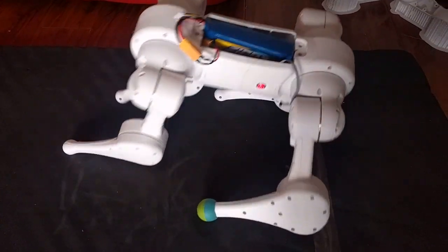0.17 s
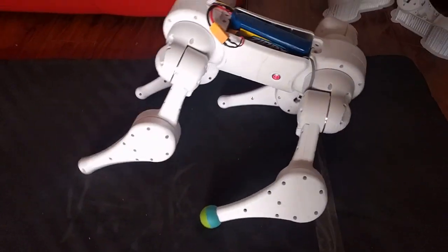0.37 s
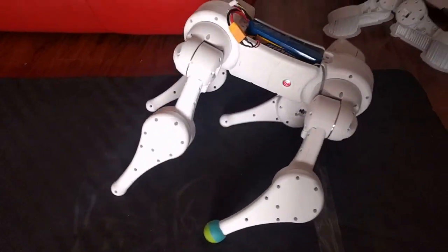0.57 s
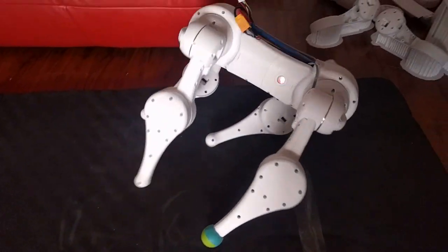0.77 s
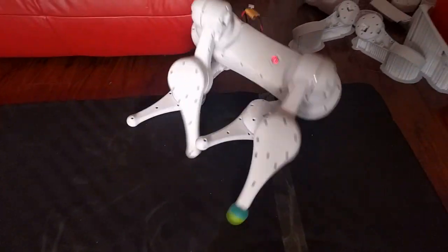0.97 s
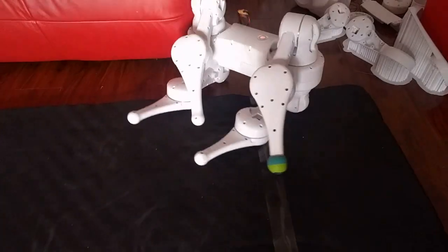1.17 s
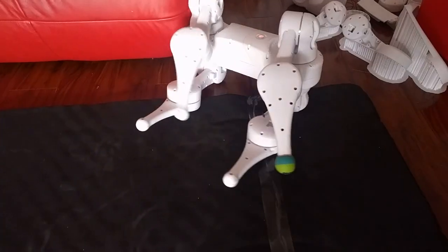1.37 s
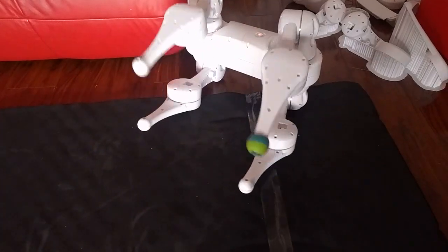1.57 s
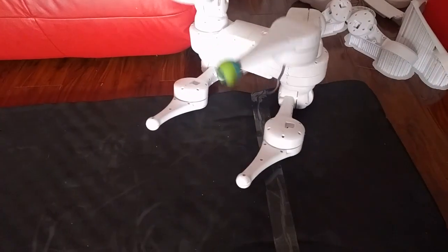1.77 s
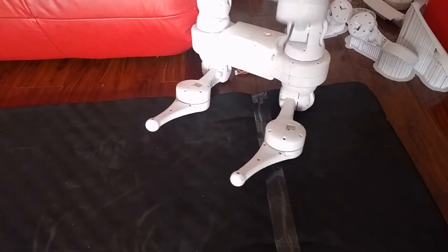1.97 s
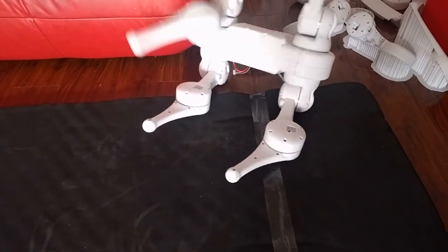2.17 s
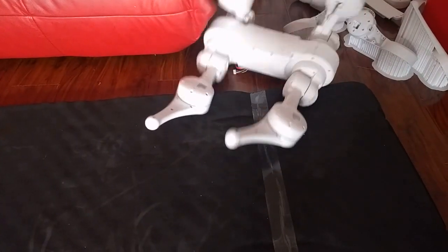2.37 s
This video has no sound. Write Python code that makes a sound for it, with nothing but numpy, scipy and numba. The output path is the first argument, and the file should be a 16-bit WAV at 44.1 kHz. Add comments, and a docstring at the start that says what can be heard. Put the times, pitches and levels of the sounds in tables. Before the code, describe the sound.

Small geared motors whirr and judder as a plastic robot clacks and thumps on a mat.

```python
"""Toy robot walking on a rubber mat

A plastic robot jerks about in a living room. Its geared motors whirr with a stream of tiny tooth and
brush ticks and, under load, judder through the hollow shell. Joints clack in gritty bursts that ring
the plastic, and the body thumps on the mat. The knocks echo lightly over a steady hush."""
import sys
import numpy as np
from scipy import signal
from scipy.fft import rfft, irfft
from scipy.io import wavfile
from scipy.ndimage import uniform_filter1d
from numba import njit

SR = 44100
rng = np.random.default_rng(int(sys.argv[2]) if len(sys.argv) > 2 else 0)


def store_pcm(level_fs):
    """Save levels as 16-bit WAV."""
    pcm = np.round(np.clip(level_fs, -1, 1) * 32767).astype(np.int16)
    wavfile.write(sys.argv[1], SR, np.atleast_2d(pcm).T)


N = 107427
T = np.arange(N) / SR


def undb(db):
    """Decibels to gain."""
    return 10 ** (np.asarray(db) / 20)


def unit(x):
    """Scale to rms 1."""
    return x / np.sqrt(np.mean(x ** 2))


def curve(table, col):
    """One column of a table as an automation line over time."""
    points = np.array(table, float)
    return np.interp(T, points[:, 0], points[:, col])


def wander(rate_hz):
    """A smooth random drift, rms 1: held values slewed twice."""
    hold = int(SR / rate_hz)
    steps = np.repeat(rng.standard_normal(N // hold + 1), hold)
    return unit(uniform_filter1d(uniform_filter1d(steps, hold), hold)[:N])


def colour(x, spectrum):
    """Shape a signal with an EQ curve, then scale to rms 1."""
    hz, db = np.array(spectrum, float).T
    bins_hz = np.fft.rfftfreq(N, 1 / SR)
    eq_db = np.interp(np.log(bins_hz + 1), np.log(hz), db, left=-70, right=db[-1] - 12)
    return unit(irfft(rfft(x) * undb(eq_db), N))


@njit
def resonance(x, hz, width_hz):
    """State-variable band-pass with gain 1 at its moving centre."""
    out, band_state, low_state = np.empty(len(x)), 0., 0.
    for i in range(len(x)):
        tuning, damping = np.tan(np.pi * hz[i] / SR), width_hz / hz[i]
        passed = (band_state + tuning * (x[i] - low_state)) / (1 + tuning * (tuning + damping))
        band_state = 2 * passed - band_state
        low_state += 2 * tuning * passed
        out[i] = damping * passed
    return out


def band(x, hz, width_hz):
    """Steep band-pass: two resonances in series."""
    hz = np.ones(N) * hz
    return resonance(resonance(x, hz, float(width_hz)), hz, 0.91 * width_hz)


def ring(blows, modes):
    """Blows excite a set of decaying sine modes."""
    t = np.arange(SR // 2) / SR
    response = sum(undb(db) * np.sin(2 * np.pi * hz * t) * 1000. ** (-t / t60) for hz, db, t60 in modes)
    return signal.fftconvolve(blows, response / np.abs(response).max())[:N]


def motors():
    """Dense tooth and brush ticks in four colours follow the load; the gear cases sing with the whine."""
    # Motor levels under changing load: time_s, rasp_db, whine_db, hiss_db, rattle_db
    levels = [(0, -55, -53, -61.5, -58.5), (.18, -55.5, -65, -76, -52.5), (.288, -46.5, -51, -66, -50.5),
              (.3, -39, -43, -53, -37), (.42, -42.5, -47.5, -65, -46.5), (.52, -49, -56, -63, -49),
              (.6, -49, -53.5, -63, -49.5), (.7, -47.5, -51, -59, -51), (.83, -49, -44.5, -55, -56.5),
              (.97, -52.5, -45, -48.5, -59), (1.015, -53, -48, -49.5, -62),
              (1.05, -42.5, -50.5, -42.5, -48), (1.12, -43.5, -46, -46, -50.5),
              (1.2, -37, -41.5, -42.5, -44), (1.29, -40, -43.5, -53, -47), (1.44, -44, -48.5, -63, -47),
              (1.498, -52, -55, -63.5, -52), (1.515, -30.5, -36.5, -58, -45), (1.67, -35, -48, -54, -36.5),
              (1.74, -39, -51.5, -59, -50.5), (1.87, -39.5, -75, -77, -48.5), (1.94, -47.5, -64, -72, -54),
              (2.1, -53, -62, -70, -60), (2.115, -54.5, -53, -61, -52), (2.29, -48.5, -56, -65, -49),
              (2.325, -39.5, -57, -58, -49), (2.335, -36.5, -34, -44, -30.5),
              (2.436, -39.5, -40, -56, -42.5)]
    # EQ curves of gear rasp, whine, brush hiss and shell rattle: freq_hz, gain_db
    rasp = [(700, -1.5), (1100, 4), (1500, 4), (2000, 3.5), (2380, 0.5), (2800, 3), (3300, -1.5),
            (3800, -2), (5000, -7.5), (7000, -17.5), (12000, -32)]
    whine = [(2000, -19), (3300, -3.5), (4000, -2.5), (4500, -0.5), (5150, -0.5), (5800, -1), (6500, -4.5),
             (7500, -10.5), (11000, -12)]
    hiss = [(3000, -33), (6000, 10), (8000, 10), (11000, 8), (16000, 6)]
    rattle = [(350, -7), (560, 1.5), (650, 5.5), (790, 4), (950, -1), (1300, -8), (2000, -22)]
    # Gear case resonances, relative to the whine: centre_hz, width_hz, level_db
    case_modes = [(2376, 180, -11), (3295, 440, -13.5), (5120, 320, -10.5)]
    ticks_per_s, flicker_db, case_waver = 9000, 0.5, 0.014
    whirr = cases = 0
    for col, spectrum in enumerate((rasp, whine, hiss, rattle), 1):
        ticks = (rng.random(N) < ticks_per_s / SR) * rng.standard_normal(N)
        whirr += colour(ticks, spectrum) * undb(curve(levels, col) + flicker_db * wander(rate_hz=39.6))
    for hz, width_hz, db in case_modes:
        wavering_hz = hz * (1 + case_waver * wander(rate_hz=5.96))
        cases += undb(db) * unit(band(ticks, wavering_hz, width_hz))
    return whirr + cases * undb(curve(levels, 2))


def judder():
    """A loaded motor's nearly regular jolts, with grit between them, make the body boom and hum."""
    # Shaking of the body: time_s, boom_db, boom_hz, hum_db, overtones_db
    shake = [(0.0, -49.5, 407, -69, -63), (0.12, -61, 316, -74, -54.5), (0.25, -53.5, 423, -72, -70),
             (0.32, -46, 467, -47, -51), (0.47, -50, 415, -55, -63.5), (0.74, -59, 290, -74, -51.5),
             (0.97, -56.5, 380, -82, -80), (1.06, -46.5, 290, -42, -47), (1.1, -48, 454, -48.5, -56),
             (1.17, -45, 422, -43.5, -49), (1.2, -37.5, 420, -48, -50), (1.28, -27.5, 463, -31, -33.5),
             (1.32, -34, 450, -45, -44), (1.36, -34.5, 357, -35.5, -43), (1.43, -38, 380, -33, -50),
             (1.52, -39, 427, -51, -31), (1.56, -25.5, 358, -51, -32), (1.67, -29, 386, -56, -29),
             (1.72, -25, 298, -55, -27), (1.76, -33, 333, -37, -35), (1.8, -31, 278, -39.5, -36),
             (1.86, -32, 315, -42, -39), (1.95, -41, 241, -47.5, -37.5), (2.07, -47.5, 277, -55.5, -54),
             (2.13, -45, 374, -61, -55), (2.27, -55, 368, -70, -51), (2.3, -41.5, 370, -49, -61),
             (2.37, -48, 407, -55, -33.5), (2.41, -29.5, 326, -39, -45), (2.44, -50, 403, -46, -34)]
    # Bands above the hum: centre_hz, width_hz, level_db
    overtone_bands = [(134.5, 12, -7), (199.4, 10.6, 0.5), (162, 40, -2)]
    judder_hz, jitter, scatter_db, roughness = 67.3, .035, 1.5, 1.1
    cycles = np.cumsum(judder_hz * (1 + jitter * wander(rate_hz=25)) / SR)
    size = undb(scatter_db * rng.standard_normal(1000))[cycles.astype(int)]  # one size per jolt
    jolts = unit(np.diff(np.floor(cycles), prepend=0) * size)
    drive = jolts + roughness * rng.standard_normal(N)
    boom = band(drive, curve(shake, 2), width_hz=228)
    hum = band(drive, judder_hz, width_hz=38)
    overtones = sum(undb(db) * unit(band(drive, hz, width)) for hz, width, db in overtone_bands)
    return sum(unit(x) * undb(curve(shake, col)) for x, col in ((boom, 1), (hum, 3), (overtones, 4)))


def room_tone():
    """The steady, low hush of room and microphone."""
    # EQ curve of the hush: freq_hz, gain_db
    hush = [(24, -36), (40, 1), (167, 2.5), (503, -8), (790, -6), (918, -6.5), (1020, -19), (5310, -23.5),
            (16000, -46)]
    return undb(-53) * colour(rng.standard_normal(N), hush)


def joint_clacks():
    """Each joint snaps with a burst of grit and a broad splash of noise, and rings the shell."""
    # Clacks, splash and ring relative to level: start_s, level_db, centre_hz, splash_db, ring_db, t60_s
    hits = [(.1320, -32.5, 3420, -7, -5, 0.027), (.2380, -41, 2960, -28, 10, .05),
            (.2928, -20, 2700, -16, -4, .05), (.3095, -19.5, 3600, -32, -1.5, 0.023),
            (.3170, -24.5, 5940, -32, -2, 0.052), (.4225, -28, 5300, -9.5, -20, 0.063),
            (.4860, -32, 3960, -1.5, -10, 0.032), (0.5653, -27, 5600, -2, -28, 0.03),
            (1.0200, -33.5, 990, -10, 1, 0.084), (1.0528, -31.5, 3570, -4, -13, .05),
            (1.1158, -21.5, 5370, -18.5, -21.5, 0.028), (1.1254, -17, 3020, -24, -8, 0.033),
            (1.1745, -20, 3600, -19, -1, 0.036), (1.2108, -23, 4700, 5, 8.5, 0.023),
            (1.2205, -30, 6500, -22, -13, 0.045), (1.2545, -27, 1660, -10, -19, 0.056),
            (1.3345, -31, 4930, -12, -12.5, .04), (1.4715, -39.5, 3050, 17.5, 1, 0.019),
            (1.5005, -24.5, 1990, -5, -3, 0.036), (1.5072, -17, 2570, -4.5, 4, 0.036),
            (1.5225, -22, 3160, -6, 5.5, 0.031), (1.6325, -21, 2450, -33, -18, 0.018),
            (1.6555, -32, 4420, 1, 4, .03), (1.6660, -35.5, 11900, 0, -22, 0.018),
            (2.0370, -38.5, 4630, -31, 0, 0.041), (2.1080, -30, 6040, 5.5, 4.5, 0.043),
            (2.2515, -39, 4650, -17, -19, 0.04), (2.3170, -26, 3500, -18, 5, 0.021),
            (2.3288, -12.5, 4550, -10.5, -17, 0.056), (2.3335, -26, 4940, -6, 6, 0.034),
            (2.4290, -47.5, 2000, 0, 8, .05)]
    # EQ curve of the splash: freq_hz, gain_db
    splash_eq = [(600, 0), (1500, 4), (4000, 2), (8000, -3.5), (16000, -10.5)]
    # Modes of the plastic shell: pitch_hz, level_db, t60_s
    shell_modes = [(614, 7, 0.055), (733.6, 9.5, 0.037), (1037.6, 5.5, 0.027), (1546, -9, 0.048)]
    attack_s = .0007
    grit_env, splash_env, blows = np.zeros((3, N))
    grit_hz = np.full(N, 3000.)
    for start_s, level_db, centre_hz, splash_db, ring_db, t60_s in hits:
        start, age_s = int(start_s * SR), np.maximum(T - start_s, 0)
        burst = np.minimum(age_s / attack_s, 1) * undb(level_db) * 1000. ** (-age_s / t60_s) / 2
        grit_env += burst
        splash_env += burst * undb(splash_db)
        grit_hz[start:] = centre_hz
        blows[start] = undb(level_db + ring_db)
    grit = unit(band(rng.standard_normal(N), grit_hz, width_hz=2480))
    splash = colour(rng.standard_normal(N), splash_eq)
    return grit_env * grit + splash_env * splash + ring(blows, shell_modes)


def body_thumps():
    """A soft press and rebound on the mat rings the body; a longer contact is duller."""
    # Landings and bounces: start_s, force_db, contact_ms
    landings = [(.5660, -33.5, 2.3), (1.0480, -42, 3.2), (1.2110, -7, 2.2), (1.2209, -14.5, 1.23),
                (1.2530, -17.5, 2.35), (1.2810, -33, 2.4), (1.3000, -21, 1.3), (1.3110, -21, 2.5),
                (1.3610, -27, 1.7), (1.5003, -9, 2.22), (1.5072, -3.5, 2.24), (1.516, -13, 3.3),
                (1.5550, -16, 1.4), (1.5800, -12, 3.26), (1.5970, -14, 3.1), (1.6110, -19, 1.5),
                (1.6540, -5, 2.3), (1.686, -30, 2), (1.707, -17, 3.5), (1.7436, -10.5, 3.0),
                (1.803, -12, 4.27), (1.831, -17.5, 2.86), (1.91, -22.5, 7.4), (2.1064, -24.5, 4.1),
                (2.3055, -13, 5.1), (2.3186, -16, 1.55)]
    # Modes of the hollow body: pitch_hz, level_db, t60_s
    body_modes = [(201.4, -23, 0.22), (283, -6.5, 0.087), (378, 6.5, 0.035), (428, 5.5, 0.055),
                  (529, 3, 0.073), (640, -15, 0.042), (760, -33, 0.035)]
    boost_db = 3
    force = np.zeros(N + SR)
    for start_s, force_db, contact_ms in landings:
        start, length = int(start_s * SR), int(contact_ms * SR / 1000)
        push = np.sin(2 * np.pi * np.arange(length) / length)
        force[start:start + length] -= undb(force_db + boost_db) * push / np.abs(push).sum()
    return ring(force[:N], body_modes)


@njit
def wall_echoes(x, t60_s, damping):
    """Sound bounces between walls: eight delay lines feed each other, duller on every round."""
    lags = np.array([431, 587, 701, 859, 1013, 1201, 1409, 1657])  # samples
    gain = 1000. ** (-lags / SR / t60_s)
    lines, dulled, out = np.zeros((8, 4096)), np.zeros(8), np.zeros(len(x))
    for i in range(len(x)):
        for k in range(8):
            dulled[k] += (1 - damping) * (gain[k] * lines[k, (i - lags[k]) & 4095] - dulled[k])
            out[i] += dulled[k] * (1 - 2 * (k % 2))  # alternating polarity
        crossfeed = dulled.sum() / 4
        for k in range(8):
            lines[k, i & 4095] = x[i] + dulled[k] - crossfeed
    return out


def scene():
    """A mono mix: the knocks echo in the room while the running noise stays close and dry."""
    knocks = joint_clacks() + body_thumps()
    room = undb(-14.5) * wall_echoes(knocks + 1e-18, t60_s=.5, damping=.22)
    return (knocks + room + motors() + judder() + room_tone())[None]


def record(dry):
    """A phone a metre away drops the deepest bass and cuts the top."""
    low_cut_hz, high_cut_hz = 45, 15800
    thinned = signal.sosfilt(signal.butter(3, low_cut_hz, "high", fs=SR, output="sos"), dry)
    return signal.sosfilt(signal.ellip(12, .2, 70, high_cut_hz, fs=SR, output="sos"), thinned)


dry = scene()
out = record(dry)
store_pcm(out)
```